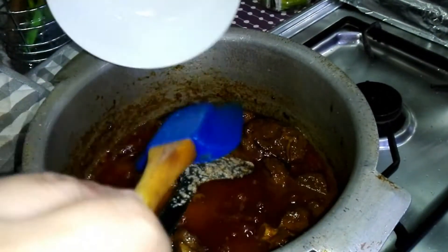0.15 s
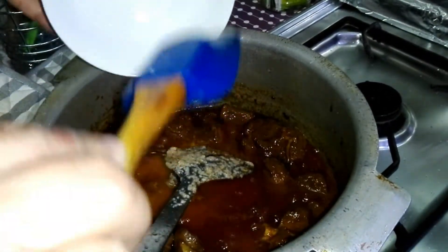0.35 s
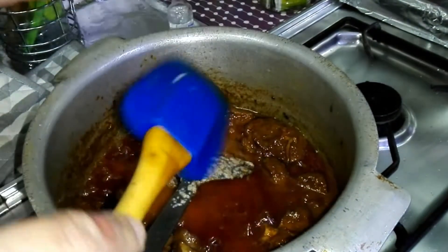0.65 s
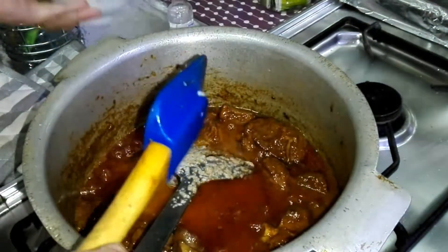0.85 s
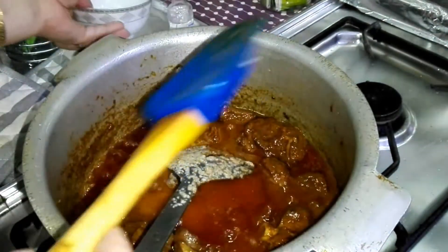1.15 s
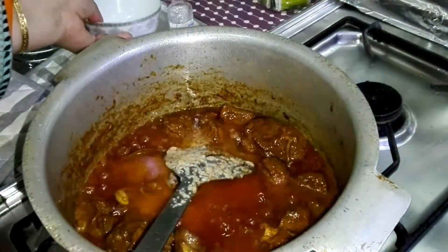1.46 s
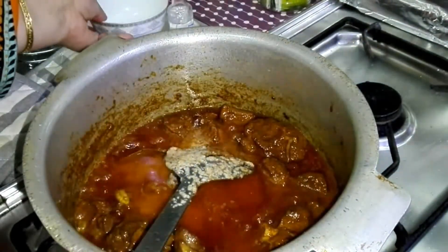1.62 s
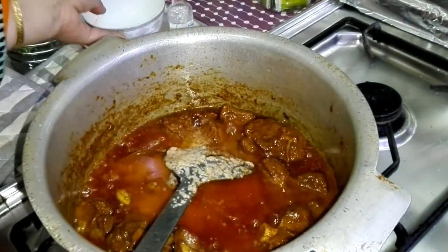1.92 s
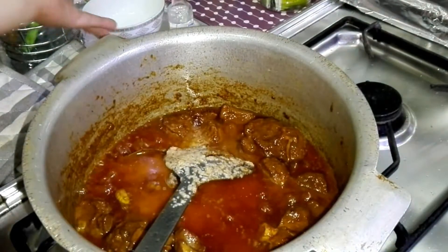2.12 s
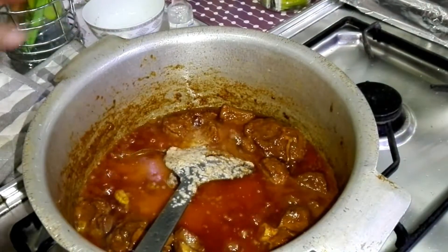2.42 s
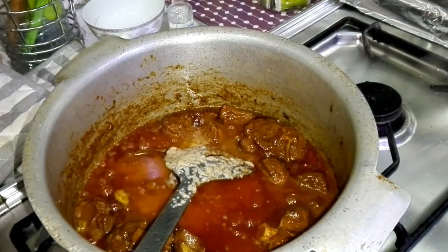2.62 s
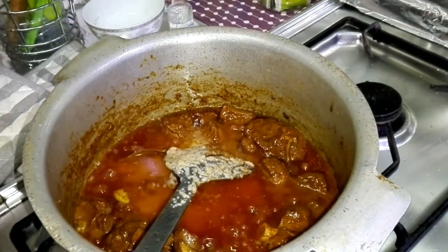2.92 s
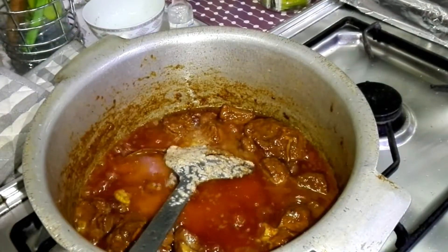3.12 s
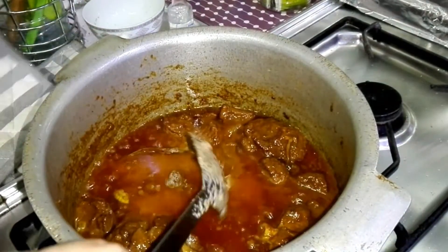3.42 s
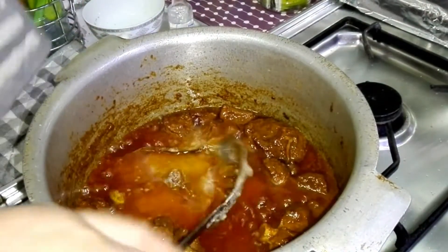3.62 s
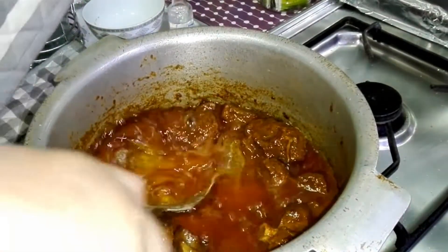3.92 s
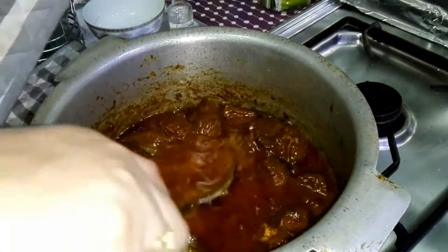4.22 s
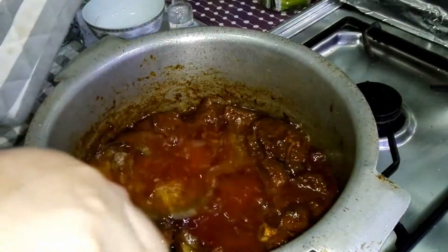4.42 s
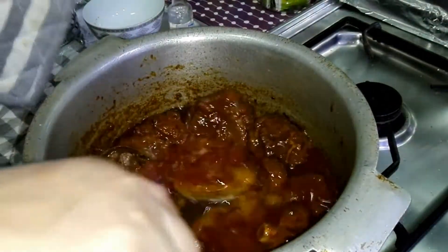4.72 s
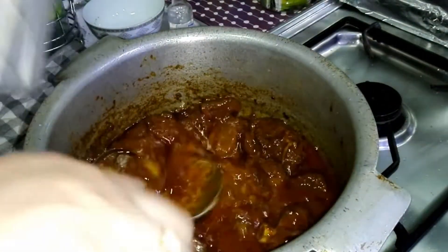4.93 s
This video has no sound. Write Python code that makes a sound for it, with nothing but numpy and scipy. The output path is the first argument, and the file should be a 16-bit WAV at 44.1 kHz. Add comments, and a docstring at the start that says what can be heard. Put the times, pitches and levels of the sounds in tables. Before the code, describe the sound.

Thick stew bubbles and softly sizzles while a bowl is set down, a spatula clatters, and a steel ladle knocks and scrapes the pot.

```python
"""Bubbles plop in a pot of thick stew, over the sizzle of fat, the hiss of the flame and a low rumble.
We are close to the stove in a home kitchen. A bowl is set on the cloth-covered counter and pushed along,
a spatula is laid down and bounces, then a steel ladle knocks and scrapes the aluminium pot, damping
its ring as it bears on it. The microphone is nearly mono; the channels differ mainly in the treble."""
import sys
import numpy as np
from scipy import signal
from scipy.io import wavfile

SR = 44100
rng = np.random.default_rng(int(sys.argv[2]) if len(sys.argv) > 2 else 0)


def dump_mix(stems):
    """Bounce the given channels to the path in sys.argv[1] as a 16-bit WAV at rate SR."""
    frames = np.atleast_2d(stems).T  # one column per channel
    limited = np.clip(frames, -1, 1)  # hard clip at full scale
    pcm = np.round(limited * 32767).astype(np.int16)
    wavfile.write(sys.argv[1], SR, pcm)


N = 223194

# Spectra of the hiss and the rumble. Each row: frequency in Hz, relative density in dB.
HISS_SPECTRUM = [(65, -24), (110, 2), (183, -8.5), (243, -7.5), (351, -12.5), (584, -16.5), (972, -14),
                 (1220, -10), (2290, -16), (2980, -14), (5380, -15.5), (10500, -22), (14300, -28.5)]
RUMBLE_SPECTRUM = [(11, -27), (18, -1), (48, 1.5), (70, -0.5), (97, -5), (140, -23), (180, -32),
                   (310, -120)]
# Stereo width. Each row: frequency in Hz, side level against mid in dB.
STEREO_WIDTH = [(100, -54), (2500, -51), (4000, -78), (6500, -5.5), (12000, -6.5)]
# The rumble swells as counter and stove are shaken. Each row: start in seconds, hold in seconds, dB.
RUMBLE_SWELLS = [(.65, 0.024, -52.5), (1.55, 0.11, -54.5), (1.97, 0.072, -50), (3.23, 0.017, -61),
                 (4.48, .03, -57), (4.87, 0.066, -55.5)]
# Bright spits and rustles. Each row: start in seconds, dB before filtering, centre in Hz, t60 in seconds.
RUSTLES = [(1.1936, -55, 8370, 0.033), (1.337, -52.5, 5270, 0.03), (1.411, -52, 9400, 0.032),
           (1.481, -43.5, 11000, 0.1), (1.49, -37.5, 11400, 0.12), (1.713, -56.5, 10000, 0.15),
           (1.734, -49, 9500, 0.38), (1.735, -45.5, 2280, 0.16), (1.775, -39.5, 10300, 0.095),
           (2.337, -47.5, 5070, 0.055), (2.6318, -48, 7450, 0.019), (2.7468, -49, 4750, 0.031),
           (2.803, -46, 5290, 0.02), (3.531, -48, 4560, 0.18), (3.535, -45.5, 11100, 0.12),
           (4.056, -49, 4920, 0.048), (4.8698, -44.5, 3740, 0.02)]
# Faint thin rings. Each row: start in seconds, peak in dB, t60 in seconds.
TINGS = [(0.152, -62.5, 0.49), (0.498, -63, 0.17)]
# The clearest bubbles. Each row: start in seconds, level in dB, pitch in Hz, t60 in seconds.
PLOPS = [(.167, -46, 1220, 0.022), (.399, -51, 654, 0.074), (.413, -53, 2900, 0.077),
         (.435, -56, 1720, 0.044), (.5, -60, 1560, 0.027), (.688, -59, 1390, 0.026),
         (.707, -42, 2920, 0.026), (.785, -55.5, 730, 0.045), (1.042, -51, 1290, 0.056),
         (1.095, -44, 1300, 0.02), (1.215, -57, 3060, 0.071), (1.597, -50, 2690, 0.04),
         (1.728, -53, 702, 0.079), (1.885, -50, 1340, 0.024), (1.973, -54.5, 2510, 0.049),
         (2.08, -53, 670, 0.033), (2.207, -55, 1880, 0.045), (2.358, -45.5, 708, 0.065),
         (2.548, -52, 1328, 0.036), (2.733, -49, 1890, .025), (2.835, -49.5, 1800, 0.032),
         (3.497, -45, 1280, 0.016), (2.997, -52, 1300, 0.026), (3.031, -50, 1360, 0.036),
         (3.117, -53.5, 2460, 0.065), (3.902, -38, 2410, 0.018), (3.933, -39, 1346, 0.024),
         (3.955, -55, 1300, 0.012), (3.985, -38.5, 1270, 0.017), (4.129, -45, 3500, 0.018),
         (4.166, -34.5, 1312, 0.029), (4.208, -56, 1406, 0.054), (4.245, -56, 2460, 0.16),
         (4.258, -52.5, 1026, 0.043), (4.282, -53, 1320, 0.055), (4.388, -50.5, 1195, 0.043),
         (4.46, -55, 730, 0.063), (4.482, -50, 1300, .03), (4.578, -49, 3340, 0.022),
         (4.613, -52, 1350, 0.032), (4.636, -50, 2800, 0.019), (4.676, -47, 1197, .04),
         (4.927, -42.5, 706, 0.04), (4.935, -27.5, 1335, 0.03), (4.953, -45, 1010, 0.033),
         (4.98, -48, 2770, .03)]
FAINT_PLOP_HZ = [740, 1250, 1380, 1854, 2770]

# Clear modes of bowl on counter, spatula, and pot with ladle.
# Each row: pitch in Hz, gain in dB, t60 in seconds.
COUNTER_MODES = [(170, 3, 0.03), (135, -5, 0.3), (165, -18, 0.2), (251, -1, 0.08), (377, -10, 0.08),
                 (470, -3, 0.08), (585, 4, 0.045), (721, -12, .1), (915, 0, 0.08), (1023, -17, 0.2),
                 (1120, -10, 0.13), (1254, -14, .15), (2360, -4.5, 0.02)]
SPATULA_MODES = [(200, 6, 0.015), (161.5, 8, 0.11), (240, 6, 0.17), (303.4, 1, 0.25), (473, -2.5, 0.2),
                 (710, -38, 0.18), (910, 6, 0.07), (1230, 8, 0.069), (1484, 13.5, 0.058), (1850, -9, 0.061),
                 (1905, 5.5, 0.05), (2229, 1, .12), (2668, 8, .11), (3382, 15, .075), (4687, 9, .085),
                 (3440, 6, .06), (6140, -7, 0.085), (8000, -9, .04), (10300, -11, .04)]
POT_MODES = [(249, -8.5, 0.37), (405, -5.5, 0.19), (740, 3, 0.071), (958, -10, .33), (1013, 0, .32),
             (1114, -14, .28), (1324, -18, .4), (1386, -7, .32), (1631, -1, .53), (1885, 0, .36),
             (2095, -21, .6), (2284, -16, .7), (2296, -21, .5), (2440, 0, .07), (2560, -18, .25),
             (3110, -27, 0.26), (3620, -24.5, 0.2), (4310, -22, 0.14), (4970, -15, 0.18), (5160, 0, 0.047),
             (5290, 1.5, 0.032), (5400, -3.5, 0.046), (6810, 0, 0.035), (6350, -4, 0.032),
             (7170, -1.5, 0.035), (7320, -1, 0.036), (8260, -46, 0.029), (8760, -10, 0.02)]
# Their many close, damped modes blur into noise. Each row: band in Hz, gain in dB, t60 in seconds.
COUNTER_BLUR = [(101, -10, 0.36), (203, -2.5, 0.095), (462, -3, 0.12), (920, -7.5, 0.14),
                (1640, -10.5, 0.064), (3500, -1.5, 0.063)]
SPATULA_BLUR = [(97, -7, 0.5), (222, -7.5, 0.32), (496, -6.5, 0.24), (1090, -4, 0.19), (1630, 0, 0.12),
                (2800, -9, 0.36), (6000, -8.5, 0.14), (11000, -5.5, 0.1)]
POT_BLUR = [(287, -15, 0.5), (595, -8, 0.063), (883, -8, 0.09), (1300, -13, 0.2), (1880, -30, 0.056),
            (2230, -22, 0.15), (3960, -29, .1), (6100, -8, 0.11), (9500, -30, 0.03), (13000, -24, .02)]
# Bowl and spatula meet the counter. Each row: start in seconds, strength in dB, contact in milliseconds.
BOWL_BLOWS = [(1.4882, -27.5, 0.67), (1.4936, -33.5, 0.2), (1.503, -52, 0.11), (1.52, -45, 0.21),
              (1.541, -42, 2.5), (1.6, -58, 0.79), (1.787, -52.5, 1)]
SPATULA_BOUNCES = [(2.5612, -44.5, 0.032), (2.564, -51.5, 0.14), (2.568, -46, 0.075), (2.575, -44, 0.11),
                   (2.58, -50, 0.18), (2.591, -45, 0.79), (2.63, -56.5, 0.54)]
# The bowl is pushed; the stew is stirred. Each row: start in seconds, hold in seconds, level in dB.
BOWL_PUSHES = [(1.79, 0.0044, -67), (1.83, 0.017, -65), (1.96, 0.065, -54.5)]
STIRS = [(4.29, 0.0075, -61), (4.45, 0.015, -65.5), (4.696, .005, -79), (4.882, 0.075, -59)]
# Ladle knocks. Each row: start in seconds, share of the pot's ring time left, seconds until the ladle
# settles, pitch in Hz of the mode struck at its still point, strength in dB, favoured pitch in Hz,
# fall-off from it in dB per octave, treble strength in dB.
LADLE_KNOCKS = [(3.3742, 0.69, 0.1, 1013, -36.5, 1600, 3.5, -31),
                (3.384, 0.17, 0.099, 1631, -29, 1350, 30, -65),
                (3.6563, 0.34, 0.22, 1631, -22.5, 1830, 17, -38),
                (3.708, 0.37, .09, 1631, -31, 1885, 54, -47),
                (3.747, 0.16, 0.067, 1631, -29.5, 1060, 23, -48),
                (3.762, 0.37, .1, 1631, -34, 1060, 25, -47), (3.787, 0.49, .1, 1885, -40, 404, 30, -58),
                (3.789, 0.89, 0.15, 1885, -35, 1200, 10.5, -42),
                (4.872, 1, 0.12, 1885, -47.5, 1610, 4.5, -71)]
# Two scraping strokes. Each row: time in seconds, force in dB, favoured pitch in Hz, treble force in dB.
LADLE_STROKES = [
    [(3.67, -75.5, 760, -80), (3.71, -69, 706, -78.5), (3.74, -61.5, 650, -72.5), (3.77, -78, 700, -72),
     (3.796, -69, 404, -69.5), (3.815, -86, 397, -94)],
    [(4.88, -81, 700, -97), (4.95, -82.5, 1000, -100), (5.0, -93, 814, -99)],
]
LADLE_FROM_HZ = 2000  # clear modes above this belong to the ladle, those below to the pot


def amp(db):
    """Decibels to gain."""
    return 10 ** (np.asarray(db, float) / 20)


def rms_one(x):
    """Scale to unit rms."""
    return x / np.sqrt(np.mean(x ** 2) + 1e-20)


def at_hz(points, hz):
    """Read a spectrum on a log-frequency axis."""
    pitches, levels = np.transpose(points)
    return np.interp(np.log(hz), np.log(pitches), levels)


def filtered(x, order, hz, kind):
    """Butterworth filter."""
    return signal.sosfilt(signal.butter(order, hz, kind, fs=SR, output="sos"), x)


def stereo(mid, side, hz):
    """Left and right, as wide as the table gives at this pitch."""
    return mid + amp(at_hz(STEREO_WIDTH, hz)) * side * [[1], [-1]]


def drift(rate_hz):
    """Slow random wander, rms about 1."""
    step = 40
    pole = np.exp(-2 * np.pi * step * rate_hz / SR)
    slow = signal.lfilter([1], [1, -2 * pole, pole * pole], rng.standard_normal(N // step + 2002))[2000:]
    return np.interp(np.arange(N) / step, np.arange(len(slow)), rms_one(slow))


def swells(rows, rise_s, fall_s):
    """Gain over time: each swell gains 30 dB in rise_s, holds, and loses 30 dB in fall_s."""
    t = np.arange(N) / SR
    return sum(amp(db - 30 * np.maximum((s - t) / rise_s, 0) - 30 * np.maximum((t - s - hold) / fall_s, 0))
               for s, hold, db in rows)


def grit(per_s, spread_db):
    """Uneven random clicks, rms 1."""
    sizes = amp(spread_db * np.minimum(rng.exponential(1, N), 5)) * rng.choice([-1, 1], N)
    return rms_one(sizes * (rng.random(N) < per_s / SR))


def blows(rows):
    """Each contact is a smooth pulse of force: a long one wakes only the low modes."""
    force = np.zeros(N)
    for s, db, ms in rows:
        pulse = np.hanning(max(round(ms * SR / 500), 1) + 2)[1:-1]  # ms wide at half height
        at = round(s * SR)
        force[at:at + len(pulse)] += amp(db) * pulse / pulse.sum()
    return force


def ring(force, hz, t60):
    """One mode: a unit click starts a sine of height 1 that loses 60 dB in t60 seconds."""
    pole = np.exp(-np.log(1000) / (max(t60, 1e-3) * SR))
    angle = 2 * np.pi * hz / SR
    return signal.lfilter([0, np.sin(angle)], [1, -2 * pole * np.cos(angle), pole * pole], force + 1e-18)


def pings(clicks, pitches, cycles):
    """Each click rings at a random one of the pitches, losing 60 dB over the given cycles; rms 1."""
    dealt = rng.integers(0, len(pitches), N)
    return rms_one(sum(ring(clicks * (dealt == k), hz, cycles / hz) for k, hz in enumerate(pitches)))


def blur(force, bands):
    """Crowded modes: the force sets off bands of dying noise."""
    t = np.arange(SR // 2) / SR
    response = 0
    for (hz, db, t60), white in zip(bands, rng.standard_normal((len(bands), len(t)))):
        band = filtered(white, 2, [hz / 1.164, min(hz * 1.416, .45 * SR)], "band")
        response += rms_one(band) * amp(db - 60 * t / t60)
    return signal.fftconvolve(force, response)[:len(force)]


def body(force, modes, bands=()):
    """An object answers a force: clear modes, signs alternating, over the blur."""
    clear = sum((-1) ** k * amp(db) * ring(force, hz, t60) for k, (hz, db, t60) in enumerate(modes))
    return clear + blur(force, bands) if bands else clear


def banded_noise(spectrum, flicker_db):
    """Third-octave bands of stereo noise, each flickering a little; rms 1."""
    out, together = 0, drift(8)
    edges = 14 * 2 ** np.arange(0, 10.4, 1 / 3)
    white = rng.standard_normal((2, 2, N + SR))
    for k, (low, high) in enumerate(zip(edges, edges[1:])):
        hz = np.sqrt(low * high)
        if spectrum[0][0] < hz < spectrum[-1][0] * 1.2:
            mid, side = filtered(white[k % 2], 2, [low, high], "band")[:, SR:]
            gain = amp(at_hz(spectrum, hz) + flicker_db * (0.44 * together + drift(25)))
            out += gain * stereo(mid, side, hz)
    return rms_one(out)


def room_tone(hiss_db=-62.5, rumble_db=-61.5, hum_db=-73):
    """Hiss of flame and microphone, a low rumble and a narrow, wavering hum."""
    hum = rms_one(ring(rng.standard_normal(N), hz=239.5, t60=0.184))
    shaken = np.hypot(amp(rumble_db), swells(RUMBLE_SWELLS, rise_s=0.12, fall_s=0.1))
    rumble = shaken * banded_noise(RUMBLE_SPECTRUM, flicker_db=0.5)
    hiss = banded_noise(HISS_SPECTRUM, flicker_db=1.41)
    return amp(hiss_db) * hiss + rumble + amp(hum_db) * hum


def kitchen_echo(near, t60=0.26, treble_t60=0.016):
    """Dense echoes reach the microphone after 4 ms; the treble dies sooner and is slightly stereo."""
    t = np.arange(SR // 2) / SR
    white = rng.standard_normal((2, len(t))) * (t > .004)
    mid, side = filtered(white, 2, 3000, "high")
    low = filtered(white[0], 4, 2400, "low") * amp(-60 * t / t60)
    echoes = low + (mid + 0.028 * side * [[1], [-1]]) * amp(-60 * t / treble_t60)
    echoes /= np.sqrt(np.sum(echoes[0] ** 2))
    return signal.fftconvolve(near[None], echoes, axes=1)[:, :N]


def rustles(octaves=0.61):
    """Short dying bursts of treble noise, partly unlike in the two channels."""
    out, t = np.zeros((2, N)), np.arange(SR // 5) / SR
    noise = rng.standard_normal((len(RUSTLES), 2, len(t)))
    for (s, db, hz, t60), white in zip(RUSTLES, noise):
        edges = [hz / 2 ** octaves, min(hz * 2 ** octaves, .45 * SR)]
        mid, side = filtered(white, 2, edges, "band") * amp(db - 60 * t / t60)
        at = round(s * SR)
        out[:, at:at + len(t)] += stereo(mid, side, hz)[:, :N - at]
    return out


def tings(hz=1710):
    """Something thin is touched and rings faintly."""
    return sum(ring(amp(db) * (np.arange(N) == round(s * SR)), hz, t60) for s, db, t60 in TINGS)


def sizzle(per_s=1900, clump_db=3.5, level_db=-75):
    """Fat at the rim crackles in clumps of tiny pitched grains."""
    grains = grit(per_s * amp(clump_db * drift(3.4)), spread_db=4)
    return amp(level_db) * pings(grains, np.geomspace(1950, 11000, 12), cycles=27)


def simmer(per_s=250, clump_db=5.7, level_db=-73.5):
    """Many small bubbles burst in clumps, each ringing briefly."""
    bursts = grit(per_s * amp(clump_db * drift(4.6)), spread_db=4.5)
    return amp(level_db) * pings(bursts, np.geomspace(1096, 1405, 10), cycles=32)


def faint_plops(count=16, level_db=-60, spread_db=3, detune=0.12, t60=0.03):
    """Rows like those of PLOPS for fainter bubbles that open at random."""
    for when, size, kind, offset in rng.random((count, 4)):
        hz = FAINT_PLOP_HZ[int(kind * len(FAINT_PLOP_HZ))] * (1 + detune * (2 * offset - 1))
        yield when * (N - 1) / SR, level_db + spread_db * (2 * size - 1), hz, t60


def plops(swell_s=0.0011, glide=0.2, film_depth=0.34):
    """A bubble opens: a sine swells fast and dies as its pitch rises, shaken by the torn film."""
    rows = [*PLOPS, *faint_plops()]
    out, t = np.zeros(N), np.arange(SR // 5) / SR
    shakes = rms_one(signal.lfilter([1], [1, -1.9, .9025], rng.standard_normal((len(rows), len(t)))))
    for (s, db, hz, t60), film in zip(rows, shakes):
        tone = np.sin(2 * np.pi * hz * t * (1 + glide * t / t60))
        envelope = amp(db - 60 * t / t60) * (1 - np.exp(-t / swell_s)) ** 2
        at = round(s * SR)
        out[at:at + len(t)] += (tone * envelope * (1 + film_depth * film))[:N - at]
    return out


def stirring():
    """The stirred stew sucks and slops, sparse and dull."""
    slops = filtered(grit(per_s=150, spread_db=1.5), 2, [190, 340], "band")
    return rms_one(slops) * swells(STIRS, rise_s=0.1, fall_s=0.074)


def bowl():
    """The bowl lands on the cloth and rocks, then is pushed along with dull friction."""
    friction = filtered(grit(per_s=280, spread_db=6), 4, [110, 330], "band")
    slide = rms_one(friction) * swells(BOWL_PUSHES, rise_s=0.041, fall_s=0.12)
    return body(blows(BOWL_BLOWS), COUNTER_MODES, COUNTER_BLUR) + slide


def spatula():
    """The spatula is laid down and clatters in a quick run of bounces."""
    return body(blows(SPATULA_BOUNCES), SPATULA_MODES, SPATULA_BLUR)


def contact(hz, db, favoured_hz, db_per_octave, treble_db):
    """Drive in dB on a mode: up to 18 dB less away from the favoured pitch; treble_db above 3 kHz."""
    if hz > 3000:
        return treble_db
    return db - np.minimum(db_per_octave * np.abs(np.log2(hz / favoured_hz)), 18)


def pressed_modes(share):
    """The ladle bears on the pot and leaves it a share of its ring time; its own modes ring on."""
    return [(hz, db, t60 * (share if hz < LADLE_FROM_HZ else 1)) for hz, db, t60 in POT_MODES]


def ladle_knocks(stilled_t60=0.026, still_point_db=17):
    """Each knock rings pot and ladle; then the ladle settles and stills the pot."""
    out, t = np.zeros(N + SR), np.arange(SR) / SR
    click = signal.unit_impulse(SR)
    for s, share, settle_s, spared_hz, *strike in LADLE_KNOCKS:
        pot, steel = [], []
        for hz, db, t60 in pressed_modes(share):
            spared = abs(hz / spared_hz - 1) < .06  # struck at its still point, a mode barely wakes
            level_db = db + contact(hz, *strike) - still_point_db * spared
            (pot if hz < LADLE_FROM_HZ else steel).append((hz, level_db, t60))
        bands = [(hz, db + contact(hz, *strike), t60) for hz, db, t60 in POT_BLUR]
        stilled = amp(-60 * np.maximum(t - settle_s, 0) / stilled_t60)
        out[round(s * SR):][:SR] += stilled * body(click, pot, bands) + body(click, steel)
    return out[:N]


def ladle_scrapes(rub, db_per_octave=14):
    """Rubbing drives the pressed pot; the favoured pitch moves with the place of contact."""
    out, t = np.zeros(N), np.arange(N) / SR
    for stroke in LADLE_STROKES:
        times, *columns = np.transpose(stroke)
        db, favoured_hz, treble_db = (np.interp(t, times, column) for column in columns)
        force = rub * (t > times[0]) * (t < times[-1])
        for resonate, rows in ((body, pressed_modes(share=0.37)), (blur, POT_BLUR)):
            for row in rows:
                drive_db = contact(row[0], db, favoured_hz, db_per_octave, treble_db)
                out += resonate(force * amp(drive_db), [row])
    return out


def ladle():
    """Steel on aluminium: knocks, and scraping over wet grit that is dull at the top."""
    rub = filtered(grit(per_s=4000, spread_db=3), 4, 8100, "low")
    return ladle_knocks() + ladle_scrapes(rub)


def scene(echo_db=-16):
    """Counter and pot close to the microphone, with the kitchen's echo and room tone behind."""
    near = bowl() + spatula() + ladle() + stirring() + plops() + tings() + simmer() + sizzle()
    return near + amp(echo_db) * kitchen_echo(near) + rustles() + room_tone()


def record(dry, stop_hz=14700):
    """The top of the treble is cut steeply."""
    return signal.sosfilt(signal.cheby2(14, 60, stop_hz, fs=SR, output="sos"), dry)


dry = scene()
out = record(dry)
dump_mix(out)
```